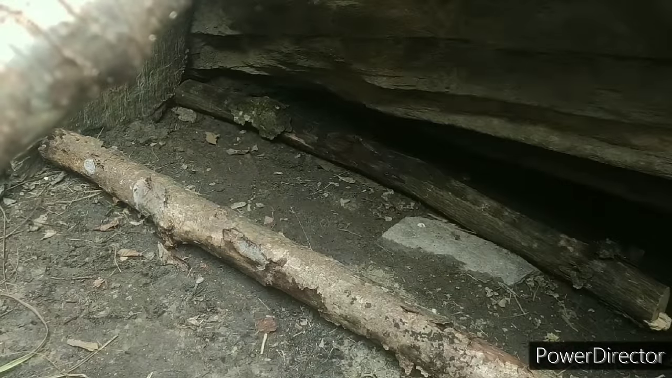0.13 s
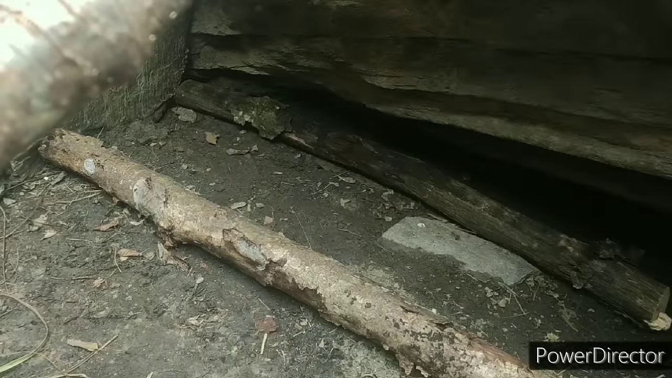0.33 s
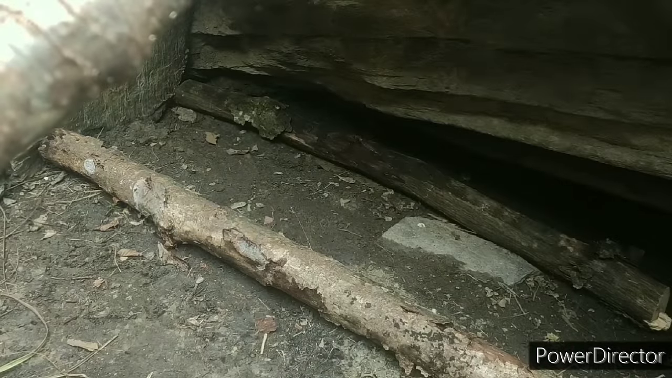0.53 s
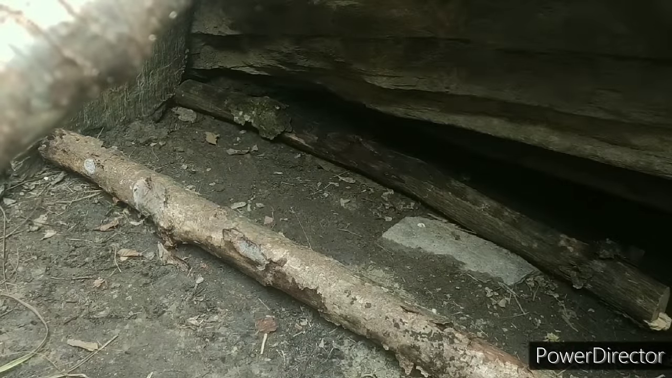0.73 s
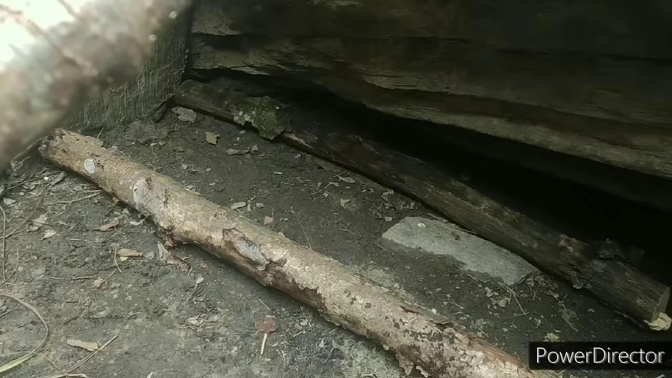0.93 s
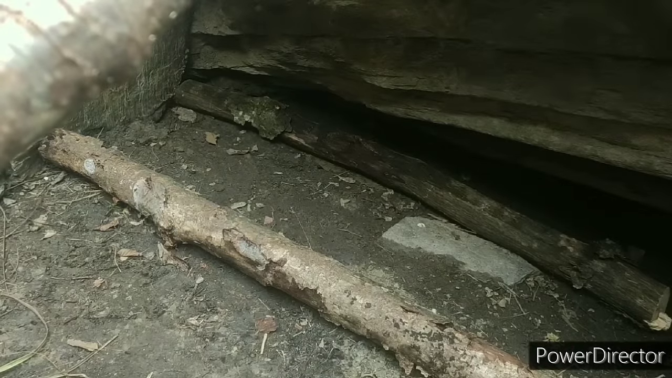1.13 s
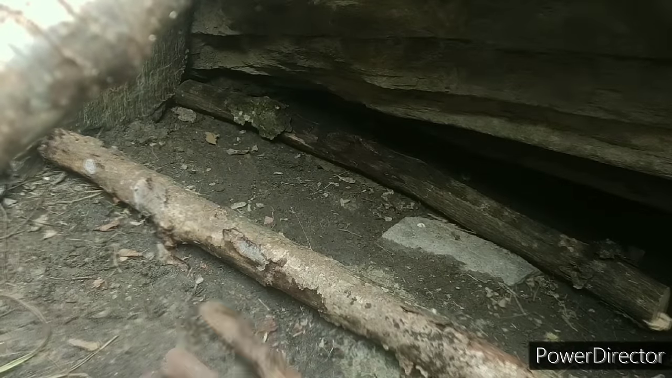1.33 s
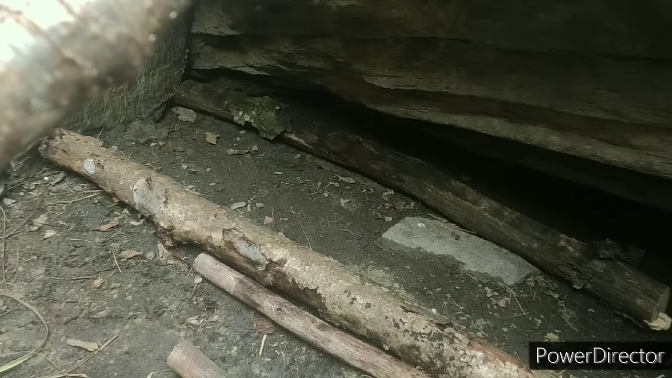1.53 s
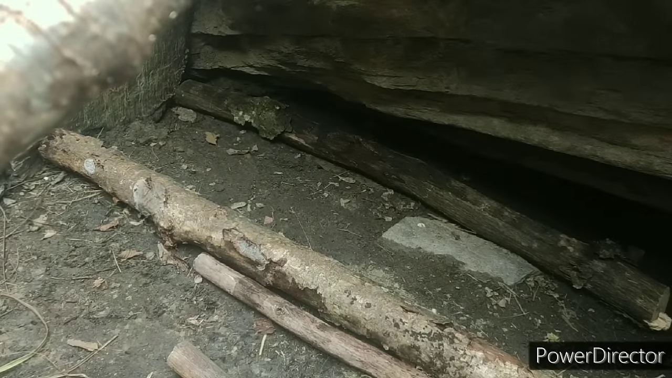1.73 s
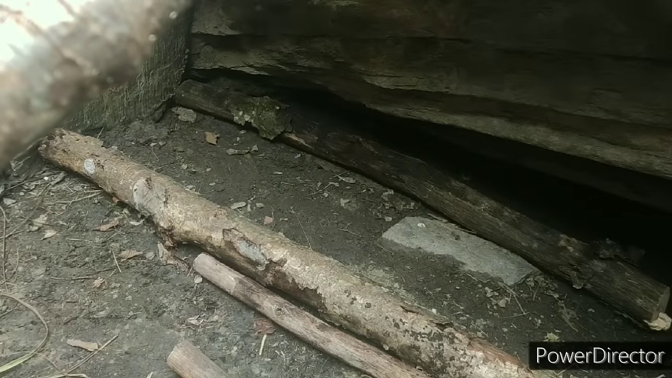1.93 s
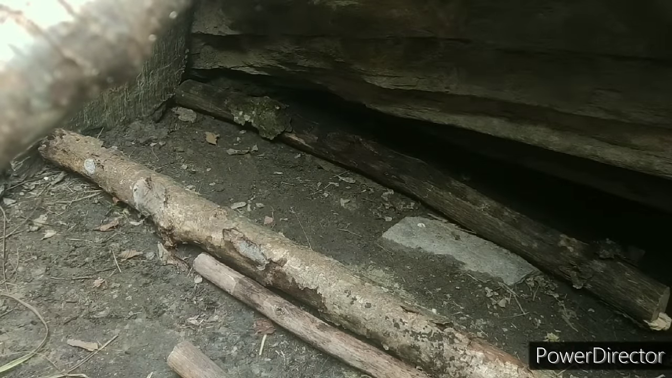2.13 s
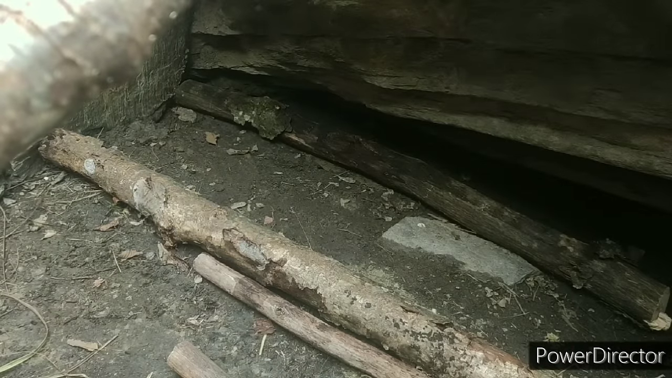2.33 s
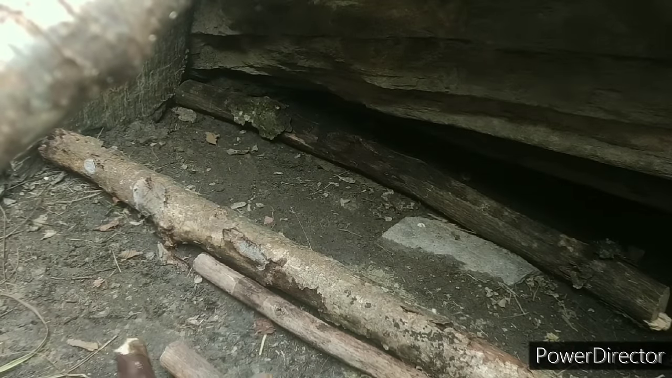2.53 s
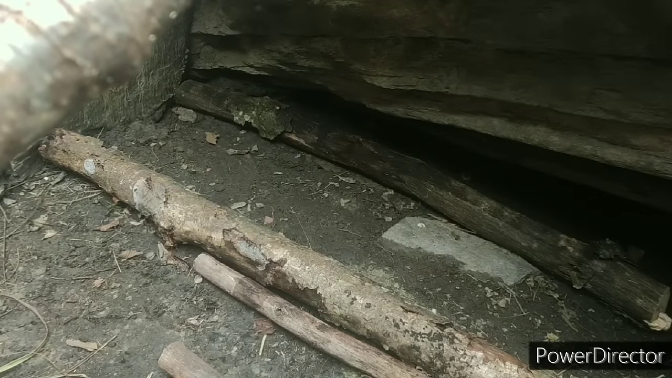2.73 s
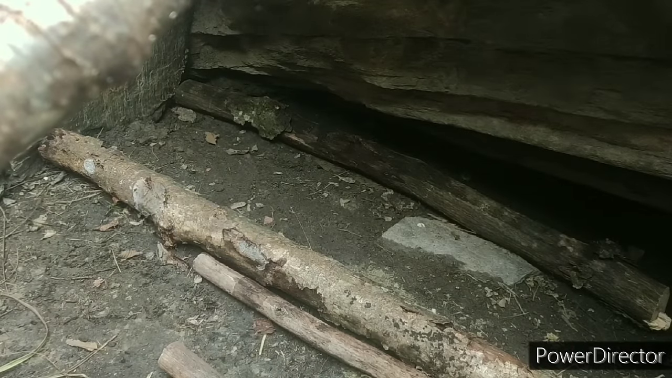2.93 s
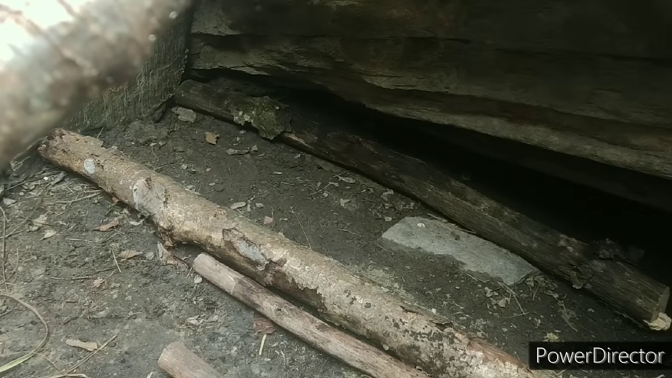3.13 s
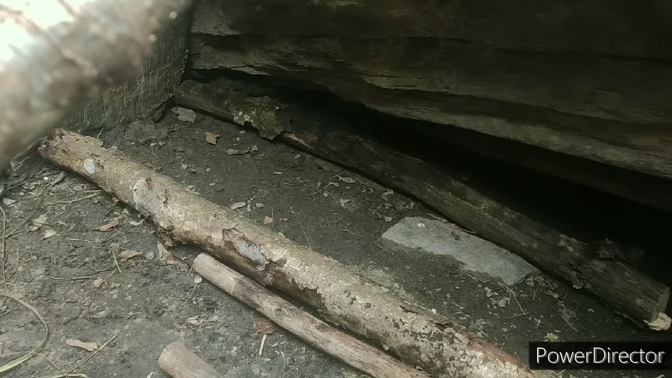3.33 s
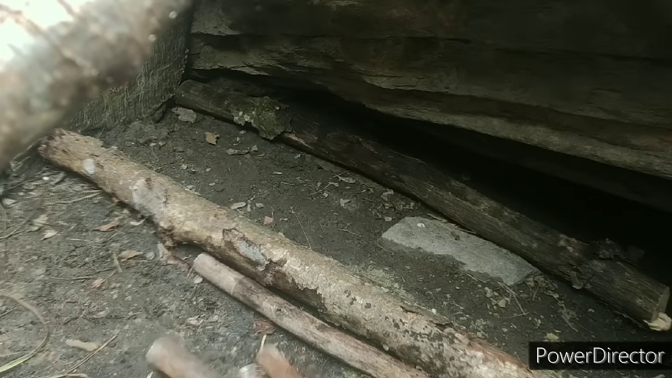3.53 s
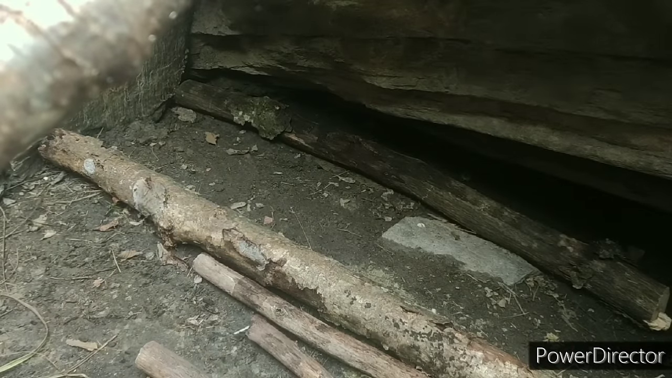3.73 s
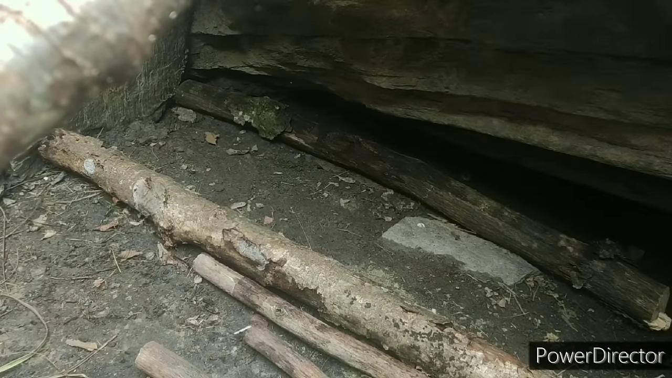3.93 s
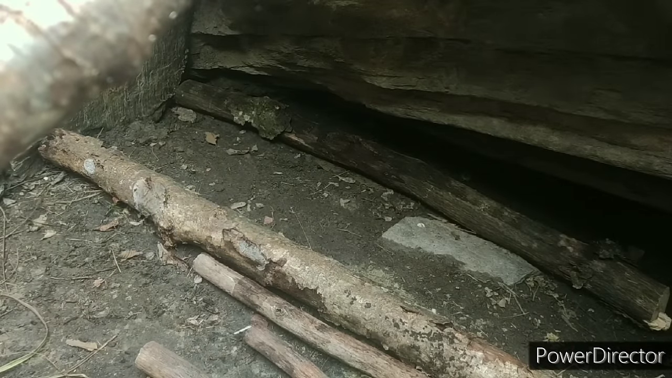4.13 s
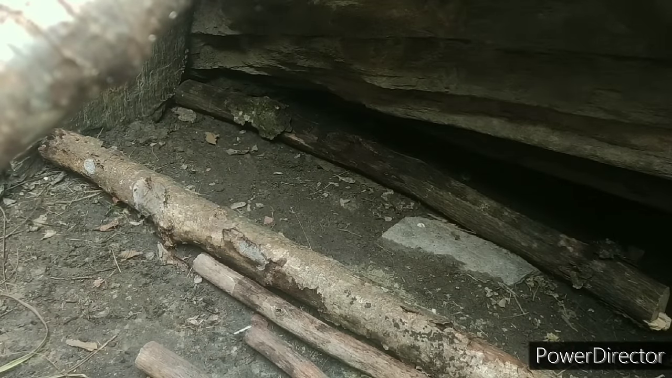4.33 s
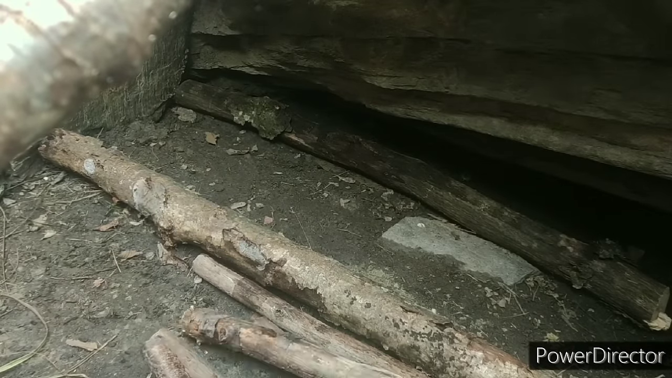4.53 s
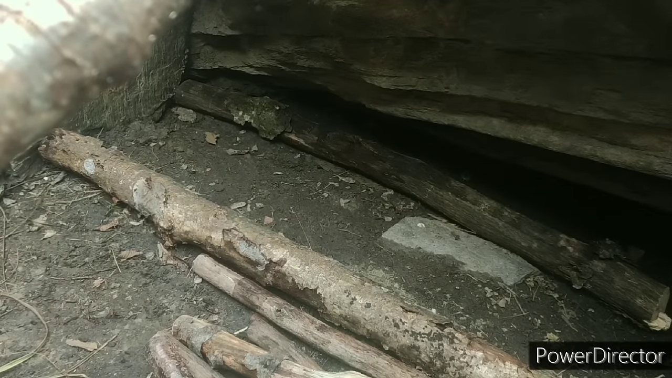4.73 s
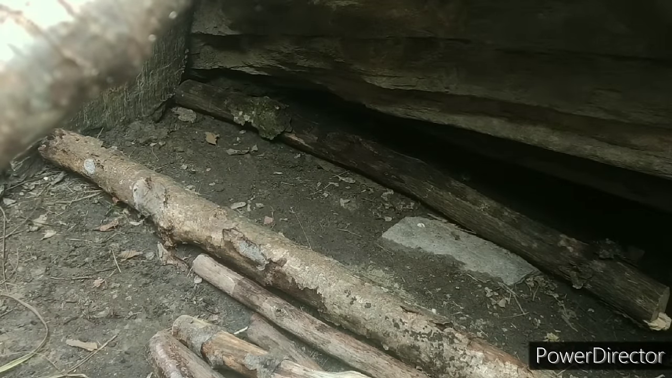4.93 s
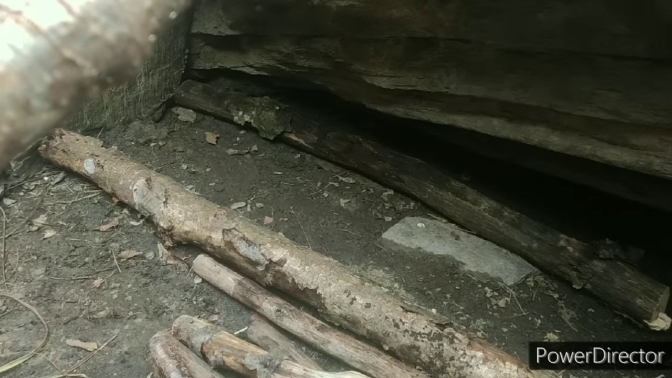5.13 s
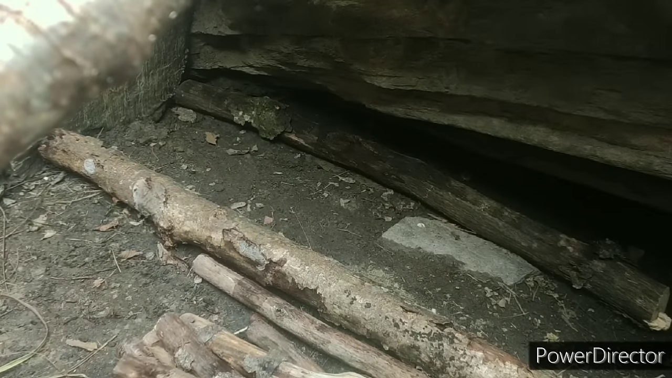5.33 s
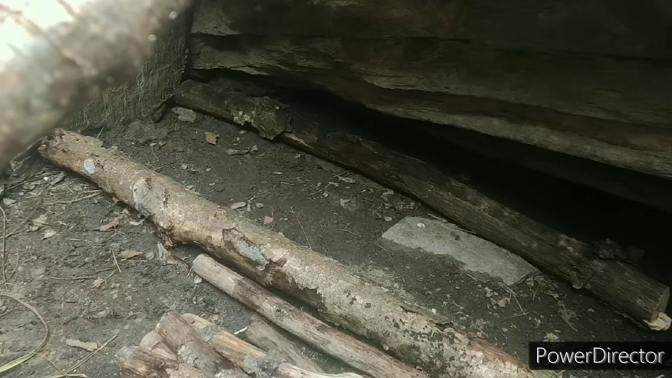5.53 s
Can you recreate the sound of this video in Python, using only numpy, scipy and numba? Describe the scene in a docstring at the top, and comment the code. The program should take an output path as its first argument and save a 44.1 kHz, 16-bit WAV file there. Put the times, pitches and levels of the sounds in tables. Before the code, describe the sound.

A soft, steady hiss fills an outdoor spot beside a rock overhang. After about a second and a half, short logs start landing on a pile close to the microphone, roughly one a second. Each of the five landings is a quick cluster of sharp wooden knocks, with a dull thud into the soil and a little crackle of bark. A very brief echo follows the knocks.

```python
"""A steady outdoor hiss runs throughout; at 0.6 s an insect-like chirp sounds faintly. From 1.5 s short
logs drop onto a nearby pile, about one a second. Each lands in several contacts that ring the logs'
bending modes, thud into the soil and crackle the bark, and an overhang answers with a brief echo.
After each loud knock an automatic gain control ducks, then slowly recovers."""
import sys
import numpy as np
from scipy import signal
from scipy.fft import rfft, irfft, next_fast_len
from scipy.io import wavfile
from scipy.ndimage import uniform_filter1d, minimum_filter1d, map_coordinates
from numba import njit

SR = 44100
rng = np.random.default_rng(int(sys.argv[2]) if len(sys.argv) > 2 else 0)


def wrap_up_sound(samples):
    """Save the sound to the file named by the first command line argument, as 16-bit audio."""
    columns = np.atleast_2d(samples).T
    # keep every value between -1 and 1, then stretch to whole-number steps
    tamed = np.clip(columns, -1, 1)
    steps = np.round(tamed * 32767).astype(np.int16)
    wavfile.write(sys.argv[1], SR, steps)


N = 250488


def amp(db):
    """dB to gain."""
    return 10 ** (np.asarray(db) / 20)


def unit_rms(x):
    """x at rms 1."""
    return x / np.sqrt(np.mean(x ** 2) + 1e-20)


def log_interp(points, hz):
    """(frequency, value) points read on a log frequency axis."""
    point_hz, values = np.transpose(points)
    return np.interp(np.log(hz + 1), np.log(point_hz + 1), values)


def filtered(x, response):
    """x through a zero-phase gain response(hz)."""
    n_fft = next_fast_len(N + SR // 2)
    return irfft(rfft(x, n_fft) * response(np.fft.rfftfreq(n_fft, 1 / SR)), n_fft)[..., :N]


def stereo_noise(spectrum, correlation):
    """Noise at rms 1 with a given spectrum and left-right correlation."""
    def mid_side_gain(hz):
        angle = np.arccos(np.clip(log_interp(correlation, hz), -1, 1)) / 2
        return amp(log_interp(spectrum, hz)) * [np.cos(angle), np.sin(angle)]
    mid, side = filtered(rng.standard_normal((2, N)), mid_side_gain)
    return unit_rms(np.array([mid + side, mid - side]))


def damped_modes(hz, db, t60_s, left_lead_rad, t):
    """Stereo sum of decaying sines."""
    offset_rad = left_lead_rad[:, None] * np.array([.5, -.5])[:, None, None]
    envelope = amp(db[:, None] - 60 * t / t60_s[:, None])
    return np.sum(envelope * np.sin(2 * np.pi * hz[:, None] * t + offset_rad), axis=1)


# Hiss spectrum (frequency [Hz], relative density [dB])
HISS_SPECTRUM = [(12, -42), (20, -23), (44, -5.5), (161, -1), (231, -6.5), (380, -4.5), (425, -7.5),
                 (516, -7), (1120, -7.5), (4260, -16), (9540, -20), (11300, -20.5), (15300, -22)]
# Hiss width (frequency [Hz], left-right correlation [-1..1])
HISS_CORRELATION = [(60, 0.95), (150, 0.96), (380, 0.98), (950, 0.89), (2380, 0.25), (5980, -0.14),
                    (15000, 0.018)]
# Hiss balance (frequency [Hz], left over right [dB])
HISS_BALANCE = [(60, 4), (240, 2.0), (950, 1.5), (3770, 1.5), (15000, 0)]
# Hiss envelope (time [s], level [dB])
HISS_ENVELOPE = [(0, -35.5), (.9, -34.5), (1.4, -35), (2.4, -34.5), (3.2, -34.5), (4.4, -35), (5.68, -35.5)]


def hiss(drift_hz=8, drift_db=0.99):
    """Broad outdoor hiss, near mono in the bass, its level drifting a little."""
    time_s, db = np.transpose(HISS_ENVELOPE)
    drift_points = rng.standard_normal(int(N * drift_hz / SR) + 4)
    drift = map_coordinates(drift_points, [np.arange(N) * drift_hz / SR])
    level_db = np.interp(np.arange(N) / SR, time_s, db) + drift_db * drift
    noise = stereo_noise(HISS_SPECTRUM + [(15700, -70)], HISS_CORRELATION)
    balance = lambda hz: amp(log_interp(HISS_BALANCE, hz) * np.array([[.5], [-.5]]))
    return amp(level_db) * filtered(noise, balance)


# Insect-like trill (time [s], length [s], frequency [Hz], level [dB])
TRILL = (.593, .046, 11300, -41)


def chirp():
    """One faint, high sine in three pulses."""
    start_s, length_s, hz, db = TRILL
    t = np.arange(N) / SR - start_s
    pulses = np.abs(np.sin(3 * np.pi * np.clip(t / length_s, 0, 1))) ** 1.5
    return amp(db) * pulses * np.sin(2 * np.pi * hz * t)


# Decay under the overhang beside the pile (frequency [Hz], t60 [s])
OVERHANG_DECAY = [(200, 0.15), (1500, 0.13), (5000, 0.1), (14000, 0.072)]


def overhang_echo(x, delay_samples=130):
    """Diffuse reflections; a fresh tail each second, as the logs land in new places."""
    out = np.zeros((2, N + 2 * SR))
    for i in range(0, N, SR):
        hz, t, noise = signal.stft(rng.standard_normal((2, SR // 4)), SR, nperseg=128)
        decay = amp(-60 * t / log_interp(OVERHANG_DECAY, hz)[:, None])
        tail = signal.istft(noise * decay, SR, nperseg=128)[1]
        wet = signal.fftconvolve(x[:, i:i + SR], tail / np.linalg.norm(tail[0]), axes=1)
        start = i + delay_samples  # 3 ms off the nearest wall
        out[:, start:start + wet.shape[1]] += wet
    return out[:, :N]


# Modes of the long, hollow logs under the pile (frequency [Hz], relative level [dB], t60 [s])
HOLLOW_MODES = [(445, -4, 0.043), (526, -3, 0.036), (684, 4.5, 0.022)]
# Modes of logs bedded on soil (frequency [Hz], relative level [dB], t60 [s])
SOIL_MODES = [(125.5, -9, 0.066), (162, -3, 0.051), (260, -4.5, 0.04)]


def ground_thud(push_db, bark_db, level_jitter, phase_jitter, t):
    """The downward push rings the bottom logs and the soil."""
    hollow_db = push_db - 1.5
    soil_db = push_db - 10.5 - 0.26 * bark_db  # sharp blows are too short to move the soil
    thud = np.zeros((2, len(t)))
    for modes, drive_db in ((HOLLOW_MODES, hollow_db), (SOIL_MODES, soil_db)):
        hz, db, t60_s = np.transpose(modes)
        mode_db = drive_db + db + 1.7 * level_jitter[:len(hz)]
        thud += damped_modes(hz, mode_db, t60_s, .1 * phase_jitter[:len(hz)], t)
    return thud


# Bark crackle spectrum (frequency [Hz], relative density [dB])
BARK_SPECTRUM = [(300, -10), (1500, -36), (4000, -0.5), (7500, 1.5), (11000, 0), (16000, -6.5)]


def bark_noise(patch_db=2.5):
    """Bright noise, patchy in time and frequency: each flake of bark has its own colour."""
    noise = stereo_noise(BARK_SPECTRUM, correlation=[(1000, 0.82), (6000, 0.11)])
    bins = signal.stft(noise, nperseg=128)[2]
    patches = uniform_filter1d(rng.standard_normal(bins.shape[1:]), size=3, axis=0)
    patches = unit_rms(uniform_filter1d(patches, size=4, axis=1))
    return unit_rms(signal.istft(bins * amp(patch_db * patches), nperseg=128)[1][:, :N])


# Dull knock spectrum (frequency [Hz], relative density [dB])
KNOCK_SPECTRUM = [(200, -16), (600, 2.5), (1400, 7), (3000, 3.5), (5000, -3), (9000, -48)]


def knock_noise():
    """The wood's dense, short-lived modes as midrange noise."""
    return stereo_noise(KNOCK_SPECTRUM, correlation=[(500, 1.0), (4000, 0.1)])


# Bending modes of the logs (frequency [Hz], t60 [s])
BENDING_MODES = [(820, 0.038), (880, 0.068), (1010, 0.14), (1070, 0.14), (1195, 0.086), (1416, 0.031),
                 (1460, 0.072), (1530, 0.079), (1675, 0.047), (1780, 0.085), (1950, 0.078), (2150, .04),
                 (2490, 0.078), (2690, 0.062), (2762, 0.026), (2820, 0.047), (2950, 0.053), (3330, 0.032),
                 (3470, 0.019), (3640, 0.036), (4120, 0.033), (4670, 0.02), (4900, .02), (5200, 0.028),
                 (5750, 0.032)]


def log_ring(low_hz, low_db, high_hz, high_db, t60_scale, level_jitter, phase_jitter, t):
    """A blow rings the bending modes near two pitches and an overtone; freer logs ring longer."""
    hz, t60_s = np.transpose(BENDING_MODES)
    near = lambda centre_hz, width: np.exp(-(np.log(hz / centre_hz) / width) ** 2)
    overtone = amp(-17.5) * near(1.7 * high_hz, 0.064)
    drive = amp(low_db) * near(low_hz, 0.033) + amp(high_db) * (near(high_hz, 0.024) + overtone)
    mode_db = 20 * np.log10(drive + 1e-6) + .5 * level_jitter
    left_lead_rad = hz / 3000 * (0.54 + 0.18 * phase_jitter)  # higher modes radiate unevenly
    return damped_modes(hz, mode_db, t60_s * np.clip(t60_scale, .1, 3), left_lead_rad, t)


# Log contacts (time [s], low pitch [Hz], low level [dB], high pitch [Hz], high level [dB],
# t60 scale [x], ground push [dB], bark crackle [dB])
LOG_CONTACTS = [ (1.491, 880, -19, 1950, -20, 0.47, -25, -24),
                (1.494, 2720, -4.5, 4660, -2.5, 0.83, -17, -4), (1.498, 1406, -6, 3393, 3, 0.99, -11.5, -8),
                (1.503, 4930, -10, 2770, -5.5, 1.1, -18, -33), (1.518, 1430, -28, 2780, -24, .8, -32, -38),
                (1.553, 1010, -34, 2700, -42, .8, -18, -44), (1.571, 1195, -32, 2490, -30, 1, -17, -38),
                (1.576, 1416, -26, 3330, -18, 0.86, -28, -17),
                (1.586, 1530, -30, 2770, -24, 1.3, -14.5, -38), (1.598, 1530, -40, 2490, -32, 1, -22, -10),
                (2.258, 1530, -24.5, 2150, -38, 0.55, -34, -40),
                (2.327, 1195, -20.5, 1685, -17, 0.38, -26, -40),
                (2.624, 1010, -35, 3470, -24, .56, -21, -12), (2.635, 820, -18, 1195, -28, 0.63, -31, -30),
                (2.640, 1550, -17, 3330, -24, 1.1, -9.5, -20),
                (2.647, 1530, -23, 1010, -19, 0.72, -15, -26),
                (2.659, 820, -17, 3480, -15, 1.5, -7.5, -9.5),
                (2.664, 1540, -9, 3470, -11, 0.65, -10.5, -21.5),
                (2.674, 1550, -16, 3640, -31, 0.84, -13, -27),
                (2.688, 1530, -23.5, 1195, -29, 1.3, -20.5, -42),
                (2.722, 880, -24, 3640, -26, 0.51, -19, -29), (2.737, 1530, -26, 3640, -40, 0.5, -25, -42),
                (2.772, 1010, -40, 2150, -42, .63, -19.5, -49),
                (2.799, 820, -26, 2950, -30, 0.54, -18, -23), (2.826, 1037, -43, 2690, -40, .8, -19, -50),
                (2.910, 1530, -41, 3610, -26.5, 1, -23.5, -16),
                (2.982, 1195, -17.5, 1950, -27, 0.78, -34, -49),
                (3.594, 1070, -24, 2490, -42, 0.3, -26, -34), (3.694, 1195, -15, 2150, -23, 0.88, -22, -30),
                (3.698, 1195, -7, 1950, -15, .3, -19, -9), (3.703, 1560, -2.5, 2820, -4.5, 0.85, -32, -14),
                (3.707, 1410, -29, 3300, -9, .86, -20.5, -32), (3.715, 1195, -25, 2950, -17, .9, -22, -28),
                (3.726, 1560, -8, 2880, 0.5, .7, -24, -16), (3.733, 1090, -14, 2950, -8.5, 1.2, -21, -34),
                (3.742, 1090, -15, 1480, -13, 1, -28, -36), (3.753, 1070, -18, 2950, -24, 0.96, -32, -38),
                (3.758, 1480, -10, 1675, -15, 0.7, -28, -29), (3.762, 1660, -11, 2950, -21, 0.85, -41, -45),
                (4.040, 1010, -26, 2490, -28, 0.43, -46, -46),
                (4.546, 1010, -15.5, 2490, -12.5, 0.65, -32, -7.5),
                (4.549, 1010, -11, 1690, -1, 0.74, -22, -22), (4.560, 1530, -8, 3330, -31, 0.63, -22, -34),
                (4.577, 2490, -17, 2680, -1, 1.05, -26, -9), (4.579, 1070, -6, 2150, -2.5, 0.58, -27, -14),
                (4.587, 1540, -2.5, 2490, -3, 0.72, -17, -15),
                (4.621, 1070, -29, 1950, -13, 0.53, -27, -22),
                (4.627, 1780, -12.5, 2690, -36, 0.97, -36, -40),
                (4.704, 1780, -26, 2690, -47, .6, -42, -46), (5.186, 820, -22, 2150, -40, .8, -37, -43),
                (5.312, 880, -23, 2150, -45, 0.75, -39, -46), (5.408, 880, -28, 2950, -40, .6, -27, -4),
                (5.416, 820, -14, 1530, -19, 0.49, -10.5, -29),
                (5.434, 1477, 3, 2950, -0.5, 0.23, -22, -13.5),
                (5.437, 1780, -14, 2950, -3.5, .5, -27, -19),
                (5.443, 1195, -8, 2490, -11, 0.72, -15.5, -10),
                (5.460, 1195, -18.5, 2950, -30, 0.96, -22, -20),
                (5.496, 1070, -27, 1530, -30, 1.2, -25, -46), (5.520, 820, -24, 2150, -34, 1.8, -24, -30)]


def falling_logs(knock_t60_s=0.034, crackle_t60_s=0.013, crackle_tail_t60_s=0.082, left_db=1.8):
    """Each contact sums ring, thud, knock and crackle, a little to the left."""
    t = np.arange(SR // 4) / SR
    knock, bark = knock_noise(), bark_noise()
    knock_decay = amp(-60 * t / knock_t60_s)
    bark_decay = amp(-60 * t / crackle_t60_s) + amp(-24 - 60 * t / crackle_tail_t60_s)
    pan = amp([[left_db / 2], [-left_db / 2]])
    jitters = rng.standard_normal((len(LOG_CONTACTS), 2, len(BENDING_MODES)))
    out = np.zeros((2, N + SR))
    for contact, jitter in zip(LOG_CONTACTS, jitters):
        time_s, low_hz, low_db, high_hz, high_db, t60_scale, push_db, bark_db = contact
        start = round(time_s * SR)
        n = min(len(t), N - start)
        ring_db = max(low_db, high_db)
        knock_db = 0.61 * ring_db + 0.39 * bark_db - 6
        blow = log_ring(low_hz, low_db, high_hz, high_db, t60_scale, *jitter, t)
        blow += ground_thud(push_db, bark_db, *jitter, t)
        blow[:, :n] += amp(knock_db) * knock_decay[:n] * knock[:, start:start + n]
        blow[:, :n] += amp(bark_db) * bark_decay[:n] * bark[:, start:start + n]
        attack_s = 0.00044 * amp(-.6 * ring_db)  # softer blows stay in contact longer
        out[:, start:start + len(t)] += blow * (1 - np.exp(-t / attack_s)) * pan
    return out[:, :N]


def scene():
    """Hiss and chirp under the logs and their echo."""
    wood = falling_logs()
    echo = amp(-16.5) * overhang_echo(wood)
    return hiss() + chirp() + echo + wood


@njit
def duck_db(target_db, attack_s, recovery_db_per_s):
    """Gain control: eases down to the target, climbs back at a steady rate."""
    gain_db, db = np.empty_like(target_db), 0.0
    for i in range(len(target_db)):
        if target_db[i] < db:
            db += (target_db[i] - db) / (attack_s * SR)
        else:
            db = min(db + recovery_db_per_s / SR, target_db[i])
        gain_db[i] = db
    return gain_db


def record(dry):
    """Ducking after loud peaks, soft clipping, band limits."""
    threshold_db, depth_db, low_cut_hz, top_hz = -12, 6.5, 30, 16360
    power = uniform_filter1d(np.mean(dry ** 2, axis=0), size=220)  # 5 ms
    level_db = 10 * np.log10(np.abs(power) + 1e-12)
    target_db = -depth_db / (1 + np.exp(-(level_db - threshold_db) / 0.28))
    held_db = minimum_filter1d(target_db, size=4001, origin=2000)  # 90 ms hold
    ducked = dry * amp(duck_db(held_db, attack_s=0.045, recovery_db_per_s=10.5))
    clipped = ducked / (1 + np.abs(ducked / 1.02) ** 8) ** (1 / 8)
    lowpass = lambda hz: np.cos(np.pi / 2 * np.clip((hz - top_hz + 500) / 600, 0, 1)) ** 2
    highpass = lambda hz: 1 / np.sqrt(1 + (low_cut_hz / (hz + 1)) ** 4)
    return filtered(clipped, lambda hz: lowpass(hz) * highpass(hz))


dry = scene()
out = record(dry)
wrap_up_sound(out)
```